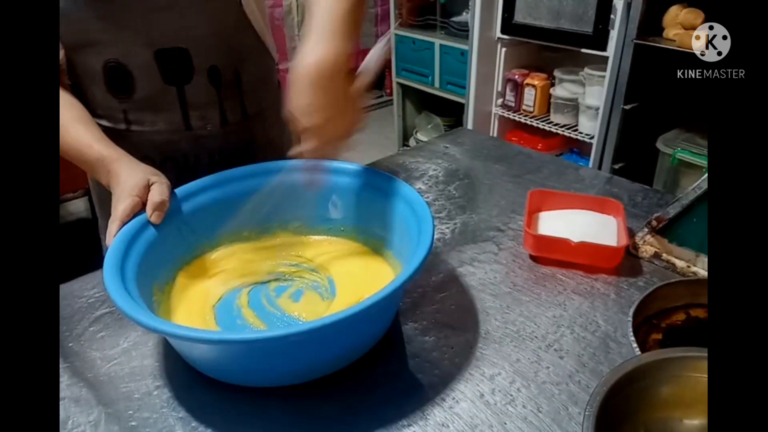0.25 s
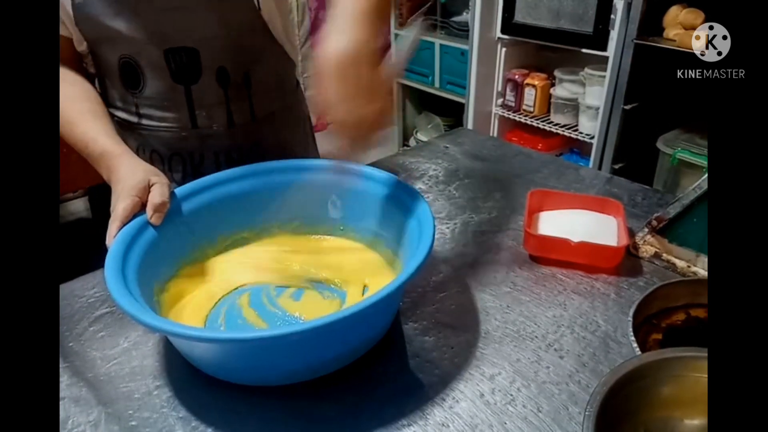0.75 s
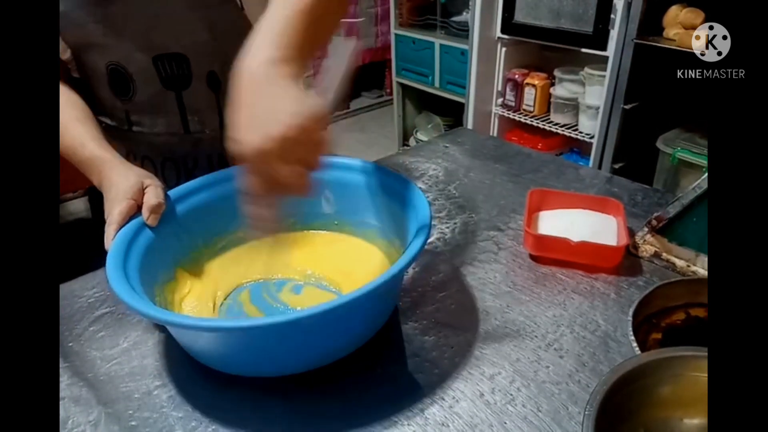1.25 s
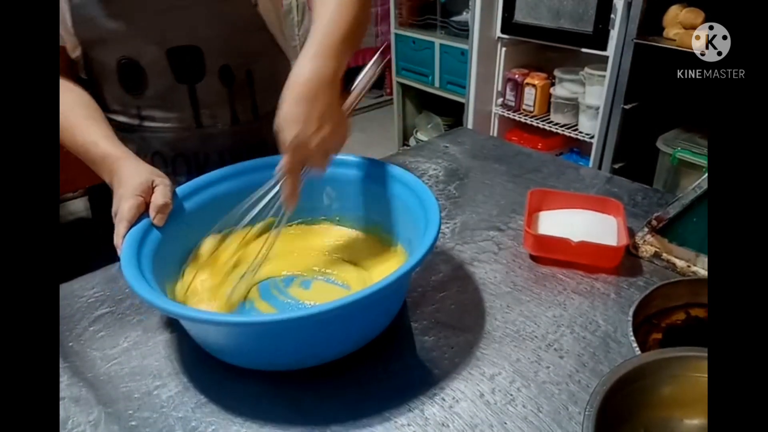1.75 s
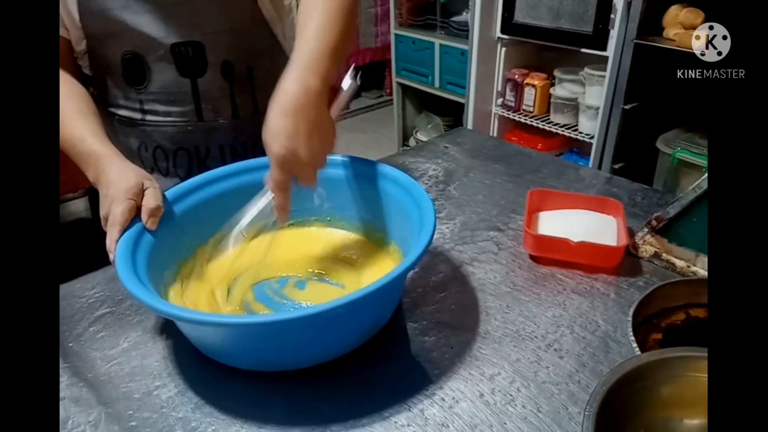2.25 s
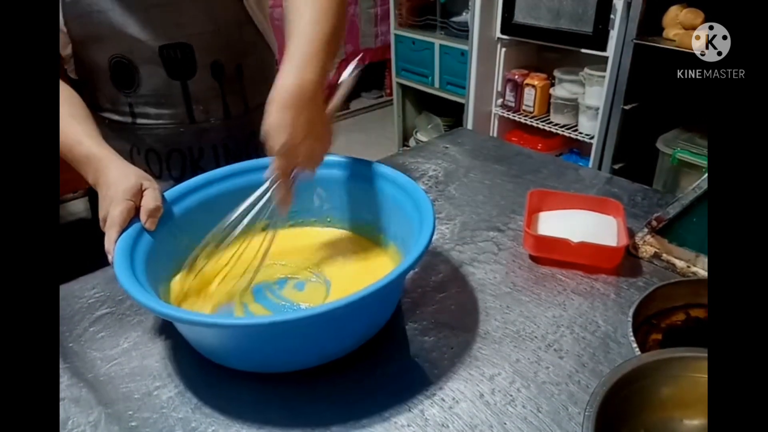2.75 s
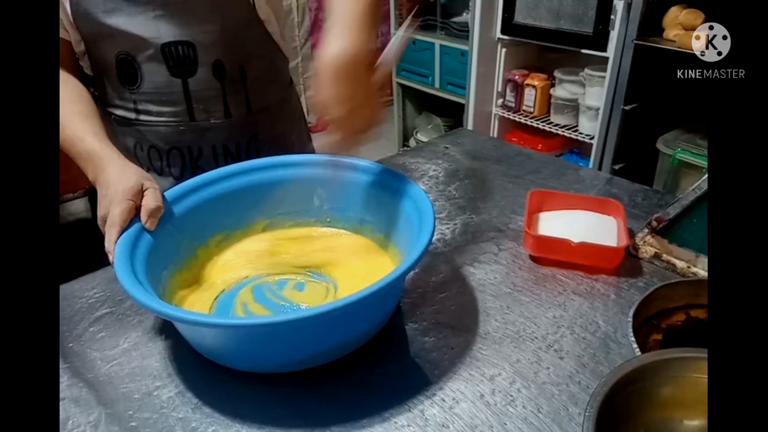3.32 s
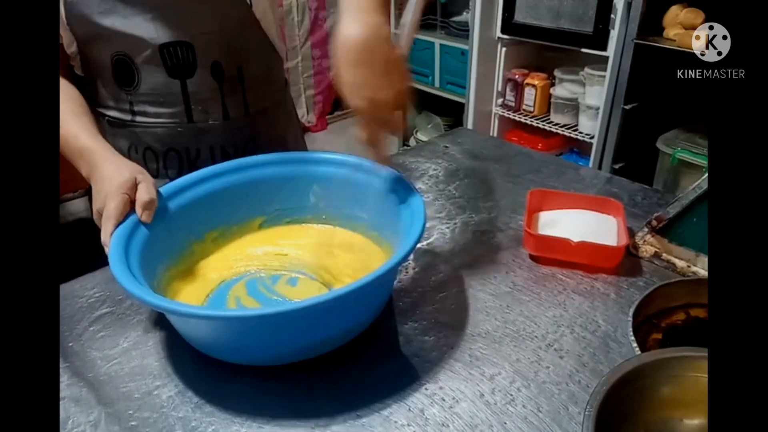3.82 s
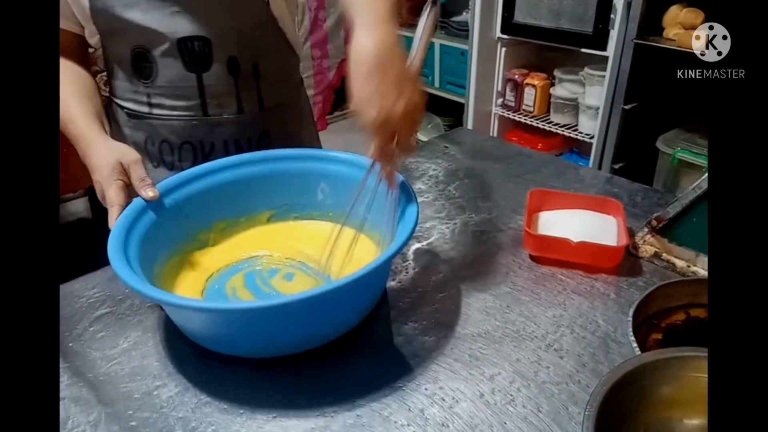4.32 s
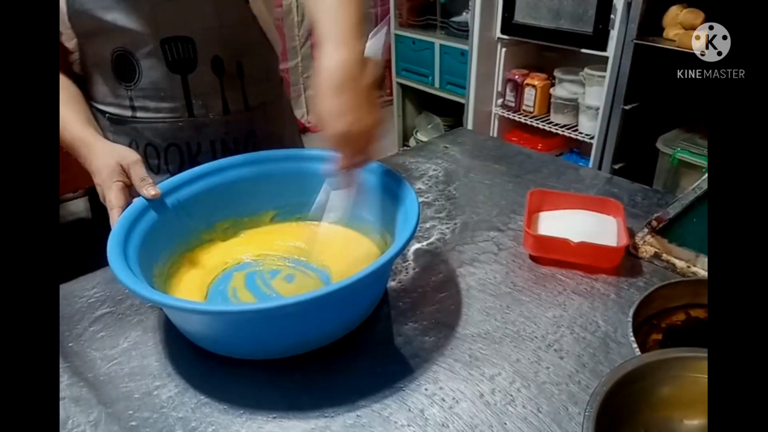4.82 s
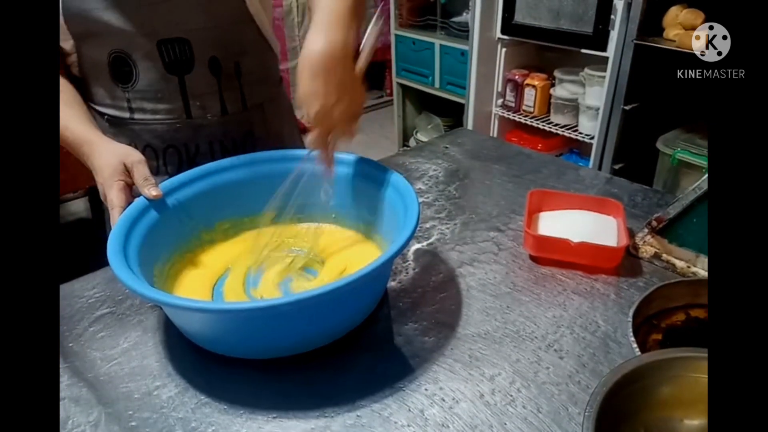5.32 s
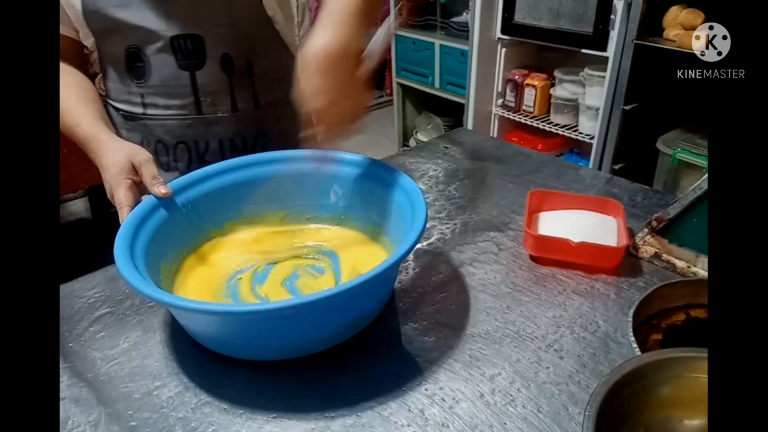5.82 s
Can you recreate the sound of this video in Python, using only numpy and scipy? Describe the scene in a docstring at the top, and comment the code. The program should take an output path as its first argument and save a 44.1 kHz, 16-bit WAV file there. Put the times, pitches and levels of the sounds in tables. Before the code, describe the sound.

Whisking is already under way and continues without stopping: brisk, swishing, raspy wire strokes through wet batter, with tiny gaps between them. Air pockets pop loudly in the first two seconds, then thin out and return later. Plastic knocks and low thuds punctuate the rhythm, with heavy bumps before the middle and near the end, plus a few tiny squeaks. Heard close, in a small, lightly echoing kitchen; it cuts off mid-stroke.

```python
"""On a kitchen table a wire whisk beats thin batter in a plastic bowl; two microphone ports pick it up for six seconds.
It opens within a stroke and keeps on at about two and a half strokes a second, with fine crackle where wires tear the film.
Hollows glug; pockets of air pop, loudest in the first two seconds, few between 2 and 4 s; loops clatter on the plastic.
The bowl drums at its low wall mode and bumps the table, hardest near 1.4 and 5.4 s; wires squeak between 3.4 and 5.4 s.
It ends within a stroke; steady room tone and the short echoes of a small kitchen lie behind it all."""
import sys
import numpy as np
from scipy import signal
from scipy.fft import rfft, irfft
from scipy.io import wavfile
from scipy.ndimage import uniform_filter1d

SR = 44100
rng = np.random.default_rng(int(sys.argv[2]) if len(sys.argv) > 2 else 0)


def transcribe(u):
    """Save the signal u as a 16-bit wav file named by the first command-line argument.

    u: samples, shape (n,) or (channels, n), limited to [-1, 1]; the rate is SR.
    q: integer samples, one column per channel.
    """
    v = np.clip(np.atleast_2d(u).T, -1, 1)
    q = np.round(v * 32767).astype(np.int16)
    wavfile.write(sys.argv[1], SR, q)


N = 267687


def gain_of(db):
    """Decibels to an amplitude factor."""
    return 10 ** (np.asarray(db) / 20)


def evened(x):
    """Scales to rms 1."""
    return x / np.sqrt(np.mean(x ** 2) + 1e-20)


def read(points, hz):
    """Reads a table of (Hz, value) along a log-frequency axis."""
    f, value = np.transpose(points)
    return np.interp(np.log(hz + 1), np.log(f + 1), value)


def add(mix, s, sound):
    """Mixes a sound in at a time in seconds."""
    part = mix[max(0, round(s * SR)):][:len(sound)]
    part += sound[:len(part)]


def colour(x, points, size=4096):
    """Causal (minimum-phase) filter with the given spectrum in dB."""
    log_gain = np.log(gain_of(read(points, abs(np.fft.fftfreq(size, 1 / SR)))))
    taps = np.fft.ifft(np.exp(np.conj(signal.hilbert(log_gain)))).real[:size // 2]
    return signal.oaconvolve(x, taps)[:len(x)]


def resonate(x, hz, width):
    """A resonance of gain 1, fixed or following a curve: shift it to 0 Hz, smooth, shift back."""
    turn = np.exp(2j * np.pi * np.cumsum(hz * np.ones(len(x))) / SR)
    r = np.exp(-np.pi * width / SR)
    return 2 * (turn * signal.lfilter([1 - r], [1, -r], x / turn + 1e-18)).real


def resonate_twice(x, hz, width):
    """Two resonances in a row, the second twice as wide, for steeper skirts."""
    return resonate(resonate(x, hz, width), hz, 2 * width)


def tone(hz):
    """Sine that follows a pitch curve."""
    return np.sin(2 * np.pi * np.cumsum(hz) / SR)


def decay(t, t60):
    """Exponential fade of 60 dB in t60 seconds."""
    return np.exp(-np.log(1000) * t / t60)


def wander(rate_hz):
    """Smooth random curve of rms 1 that moves up to about a rate."""
    hz = np.fft.rfftfreq(N, 1 / SR)
    return evened(irfft(rfft(rng.standard_normal(N)) / (1 + (hz / rate_hz) ** 4), N))


def grains(per_s, spread_db):
    """Random clicks, most small and a few large."""
    size = gain_of(spread_db * np.minimum(rng.exponential(1, N), 4))
    return size * rng.choice([-1, 1], N) * (rng.random(N) < per_s / SR)


def band_noise(low_hz, high_hz, size):
    """Noise of rms 1 between two edges."""
    band = signal.butter(3, [low_hz, high_hz], "bandpass", fs=SR, output="sos")
    return evened(signal.sosfilt(band, rng.standard_normal(size)))


# Spectrum of the empty kitchen. Each row: frequency in Hz, relative density in dB per Hz.
KITCHEN_HUSH = [(20, -29), (75, 6), (130, -14), (300, -0.5), (1000, -15), (3000, -8), (7000, -28),
                (15000, -32)]


def room_tone(floor_db=-56):
    """The quiet background of the kitchen: steady coloured noise, independent at each port."""
    return gain_of(floor_db) * np.array([evened(colour(rng.standard_normal(N), KITCHEN_HUSH)) for _ in range(2)])


# How long the kitchen rings. Each row: frequency in Hz, t60 in s.
KITCHEN_DECAY = [(100, 0.041), (500, 0.29), (2000, 0.3), (5000, 0.25), (12000, 0.22)]


def kitchen(x, early_db=6, early_s=0.0072):
    """Sparse echoes, strongest from the table and near shelves, each band dying at its own speed."""
    t = np.arange(SR) / SR
    taps = rng.choice([-1., 1.], (2, SR)) * (rng.random((2, SR)) < 3000 / SR) * (t > .002)
    taps = taps * (1 + gain_of(early_db) * np.exp(-t / early_s))
    hz, age, z = signal.stft(taps, SR, nperseg=256)
    fade = gain_of(-60 * age / read(KITCHEN_DECAY, hz)[:, None])
    tail = signal.istft(z * fade, SR, nperseg=256)[1]
    tail = tail / np.linalg.norm(tail, axis=1, keepdims=True)
    return signal.fftconvolve(x, tail, axes=1)[:, :N]


# First echoes off the bowl wall and the table; the strongest comes about 30 cm the longer way.
# Each row: delay to the left port in s, delay to the right port in s, level in dB.
FIRST_ECHOES = [(.00095, 0.00079, -10.5), (.0019, 0.0012, -38), (.0034, 0.0028, -31)]


def bounced(x):
    """The nearest surfaces send a sound to each port again, by paths of different length."""
    hz = np.fft.rfftfreq(2 * N, 1 / SR)
    paths = 1 + sum(gain_of(db) * np.exp(-2j * np.pi * np.outer([left, right], hz))
                    for left, right, db in FIRST_ECHOES)
    return irfft(rfft(x, 2 * N) * paths)[:, :N]


# Modes of the hollow of the bowl. Each row: frequency in Hz, width in Hz, relative level in dB.
HOLLOW_MODES = [(227, 7.1, 2), (429, 30, 2), (509.3, 30.3, 7.5), (735, 46, 5), (810.4, 17.5, 1),
                (1330, 70, -12)]


def bowl(x, ring_db=-2, drift=0.015, drift_hz=4):
    """Part of the sound leaves the bowl at once, part rings in its hollow, whose modes drift as the batter swirls."""
    swirl = 1 + drift * wander(drift_hz)
    return x + sum(gain_of(db + ring_db) * resonate(x, hz * swirl, width) for hz, width, db in HOLLOW_MODES)


def drumming(push, wall_hz=105, width_hz=26, rumble_db=-12):
    """The push of the whisk keeps the wall throbbing at its lowest mode, over a broader rumble."""
    sway = evened(resonate_twice(rng.standard_normal(N), wall_hz, width_hz))
    return push * (sway + gain_of(rumble_db) * band_noise(low_hz=65, high_hz=149.0, size=N))


# Higher modes of the bowl that a bump sets off.
# Each row: frequency in Hz, level relative to the bump in dB before its hardness, t60 in s.
THUD_MODES = [(170, -15, 0.095), (230.4, -9.5, 0.072), (334, -5, 0.03), (500, -20, 0.11)]
# The bowl bumping the table. Each row: start in seconds, level in dB, t60 of the ring in s,
# hum of the table top relative to that level in dB, settled pitch of the wall in Hz, hardness of the thud in dB.
TABLE_BUMPS = [(0.403, -24, 0.27, -10, 101.3, 3), (0.554, -41, 0.14, -18, 114, -3),
               (0.715, -19.5, 0.25, -20, 105, -2), (0.872, -17, 0.37, -36, 105.6, -25),
               (0.9263, -20, 0.19, -28, 104, -14), (1.008, -21, 0.15, -16, 108, -17),
               (1.093, -18, 0.11, -8, 108, 2), (1.124, -18, 0.18, -2.5, 102, -3),
               (1.39, -5.5, 0.26, -26, 103, -3), (1.467, -9, 0.086, -20, 104, -14),
               (1.586, -20, 0.19, -11, 99, -8), (1.936, -28.5, 0.4, -18, 106, -2),
               (2.077, -20.5, 0.41, -18, 104.4, 7), (2.241, -19, 0.13, -21, 101, -17),
               (2.3, -23, 0.22, -24, 102, -14), (2.365, -18.5, 0.19, -23, 98, -12),
               (2.82, -20.5, 0.24, -14, 107.5, -2), (3.578, -22, 0.18, -22, 109.6, -10),
               (3.75, -35, 0.17, -16, 103, -14), (4.117, -25, 0.4, -20, 108.4, -10),
               (4.371, -29, .2, -7, 94.5, -5), (4.598, -21, 0.24, -8, 100, -10),
               (4.825, -26.5, 0.16, -2, 102, -6), (5.199, -28, 0.18, -7, 101, -8),
               (5.389, -6.5, 0.16, -17, 99.5, -7), (5.455, -18, 0.25, -2, 99.7, -20),
               (5.551, -25, 0.26, 1, 100, -14), (5.992, -17.5, 0.18, -8, 98.4, 2.5)]


def bumps(rise_s=0.016, stiffen=0.21, relax_s=0.003, thud_rise_s=0.0042, table_hz=68):
    """The base lands with a thud; the wall rings on, a little sharp while it is bent, and the table top hums."""
    t, out = np.arange(SR // 2) / SR, np.zeros(N)
    for s, db, t60, table_db, hz, hard_db in TABLE_BUMPS:
        wall = tone(hz * (1 + stiffen * np.exp(-t / relax_s)))
        top = gain_of(table_db) * np.sin(2 * np.pi * table_hz * t)
        ring = (wall + top) * decay(t, t60) * (1 - np.exp(-t / rise_s))
        thud = np.zeros(len(t))
        for mode_hz, mode_db, mode_t60 in THUD_MODES:
            mode = np.sin(2 * np.pi * (mode_hz * t + rng.random())) * decay(t, mode_t60)
            thud += gain_of(mode_db + hard_db) * mode
        add(out, s, gain_of(db) * (ring + thud * (1 - np.exp(-t / thud_rise_s))))
    return out


# What the plastic wall rings with when struck. Each row: frequency in Hz, width in Hz, relative level in dB.
PLASTIC_MODES = [(418, 40, -4), (506, 23, 8.5), (728, 32, 0), (816, 20, 3.5), (1168, 36, -8),
                 (1215, 30, -0.5), (2040, 70, -5), (2324, 60, -5), (2740, 90, -6), (3094, 71, -1)]


def wall_ring(x, spot_hz, spot_db=6.5):
    """The plastic wall answers a blow, most at the modes that the struck spot favours."""
    # a mode loses spot_db at one octave from the favoured pitch, and four times that at two
    return sum(gain_of(db - spot_db * np.log2(hz / spot_hz) ** 2) * evened(resonate(x, hz, width))
               for hz, width, db in PLASTIC_MODES)


# A wire on bare plastic. Each row: start in seconds, length in s, level in dB before the trim, pitch in Hz.
WIRE_SQUEAKS = [(3.389, 0.012, -28, 4120), (3.573, .06, -30, 2475), (3.592, 0.012, -34, 2970),
                (5.338, 0.01, -18.5, 2134)]


def squeaks(trim_db=-3, jitter=0.018, jitter_hz=420, chatter_db=4):
    """Stick and slip gives a brief, unsteady, chattering tone."""
    out = np.zeros(N)
    unsteady = 1 + jitter * wander(jitter_hz)
    grip = gain_of(chatter_db * wander(jitter_hz))
    for s, length, db, hz in WIRE_SQUEAKS:
        span = slice(round(s * SR), round((s + length) * SR))
        pitch = hz * unsteady[span]
        squeak = tone(pitch) * grip[span] * signal.windows.tukey(len(pitch), .7)
        add(out, s, gain_of(db + trim_db) * evened(squeak))
    return out


# The loops of the whisk clattering hard on the bowl.
# Each row: start in seconds, level in dB, fade in s, pitch that the struck spot favours in Hz.
LOOP_KNOCKS = [(.394, -18, 0.0087, 800), (.86, -18.5, 0.024, 920), (1.097, -13, 0.012, 594),
               (2.078, -32, 0.049, 1000), (2.246, -27.5, 0.016, 900), (4.34, -23, 0.011, 800),
               (5.324, -23.5, 0.009, 750), (5.348, -12, 0.0061, 480), (5.444, -25, 0.0089, 950),
               (5.505, -21.5, 0.011, 480)]


def knocks(wire_gap_s=.0035, rise_s=0.0021, cushion_hz=2600):
    """The wire loops land one after another, cushioned by batter, and set the wall ringing."""
    t, out = np.arange(SR // 4) / SR, np.zeros(N)
    for s, db, fade_s, spot_hz in LOOP_KNOCKS:
        fade = np.exp(-t / fade_s) * (1 - np.exp(-t / rise_s))
        landed = np.cumsum(rng.uniform(.5, 1.5, size=24)) * wire_gap_s
        # one click of random sign at each landing
        rattle = np.diff(np.searchsorted(landed, t), prepend=0) * rng.choice([-1, 1], len(t)) * fade
        ring = signal.lfilter(*signal.butter(2, cushion_hz, fs=SR), wall_ring(rattle, spot_hz))
        add(out, s, gain_of(db) * ring * np.linalg.norm(fade) / np.linalg.norm(ring))
    return out


# The harder slaps of wires on the wall. Each row: start in seconds, level in dB before the trim.
WIRE_SLAPS = [(0.2356, -16.5), (0.3762, -15.5), (0.3916, -25), (.398, -10.5), (0.4857, -16), (0.5503, -14),
              (0.724, -18), (0.8557, -9), (0.863, -14), (1.09, -15), (1.1975, -37), (1.237, -23),
              (1.3432, -14), (1.4204, -18), (1.4638, -13), (1.533, -13), (1.603, -13), (1.6569, -11),
              (2.064, -24), (2.0759, -14), (2.245, -12.5), (2.389, -21), (2.462, -20), (2.9966, -13.5),
              (3.031, -14.5), (3.1172, -17), (3.3722, -20), (3.44, -33), (3.4862, -23), (3.5798, -18),
              (3.7815, -26.5), (3.959, -19.5), (4.0983, -27), (4.1608, -17), (4.2667, -21), (4.3376, -13),
              (4.4393, -13.5), (4.447, -16), (4.7785, -16), (4.792, -18), (4.8713, -22), (4.8998, -30),
              (4.9422, -13), (5.1346, -18), (5.1968, -14.5), (5.2435, -16.5), (5.3252, -17), (5.34, -13),
              (5.3443, -6.5), (5.442, -12.5), (5.5025, -11.5), (5.5508, -19), (5.6653, -17), (5.7854, -17),
              (5.948, -26.5), (5.966, -16.5)]
# centre pitch of the struck plastic, and its spread from spot to spot (natural log)
TICK_HZ, TICK_SCATTER = 2400, 0.25


def slaps(trim_db=-4.5, fade_s=0.0026, width_hz=700, tick_db=6, dull_hz=5600, ring_db=-5, ring_octaves=.6):
    """Wires hit the wet plastic in a burst of noise; the spot ticks at its own pitch and the wall rings briefly."""
    t, out = np.arange(SR // 8) / SR, np.zeros(N)
    fade = np.exp(-t / fade_s)
    for s, db in WIRE_SLAPS:
        hz = TICK_HZ * np.exp(TICK_SCATTER * rng.standard_normal())
        burst = colour(rng.laplace(size=len(t)) * fade, SCRAPE_SPECTRUM)
        ring = wall_ring(burst, hz * 2 ** (ring_octaves * rng.uniform(-1.2, 0)))
        tick = gain_of(tick_db) * resonate(burst, hz, width_hz)
        hit = evened(burst + tick) + gain_of(ring_db) * evened(ring)
        hit = signal.lfilter(*signal.butter(1, dull_hz, fs=SR), hit)  # batter cushions the blow
        add(out, s, gain_of(db + trim_db) * hit * np.linalg.norm(fade) / np.linalg.norm(hit))
    return out


# Hollows opening behind the whisk.
# Each row: start in seconds, length in s, level in dB before the trim, first pitch in Hz.
HOLLOW_GLUGS = [(0, 0.026, -28, 583), (0.388, 0.025, -38, 760), (0.425, 0.034, -26.5, 553),
                (0.838, 0.058, -28, 956), (2.385, 0.033, -32.5, 592), (2.468, 0.027, -33.5, 880),
                (2.512, 0.037, -27, 573), (2.945, 0.029, -38, 750), (2.968, 0.019, -33.5, 503),
                (3.39, 0.023, -30.5, 770), (4.27, 0.035, -31, 828), (4.726, 0.04, -30, 525),
                (4.912, 0.029, -29, 596), (4.941, 0.022, -29, 652), (5.085, 0.022, -31, 1000),
                (5.091, 0.023, -28, 815), (5.321, 0.018, -21.5, 910), (5.786, 0.023, -30.5, 652),
                (5.912, 0.025, -34, 844), (5.951, 0.013, -24, 530)]
GLUG_FALL = 0.59  # last pitch over first pitch


def glugs(trim_db=-5, width_hz=120, wire_gap_s=.009, spatter=0.055, rough_db=-6, peak_early=.6):
    """The hollow behind the whisk rings with a pitch that falls as it opens; passing wires pluck and roughen it."""
    out = np.zeros(N)
    for s, length, db, first in HOLLOW_GLUGS:
        hz = np.geomspace(first, first * GLUG_FALL, int(length * SR))
        plucks = spatter * rng.standard_normal(SR)
        plucks[(np.cumsum(rng.uniform(.5, 1.5, size=16)) * wire_gap_s * SR).astype(int)] += 1
        plucks[0] += 1
        plucked = resonate_twice(plucks[:len(hz)], hz, width_hz)
        hollow = evened(tone(hz)) + gain_of(rough_db) * evened(plucked)
        swell = np.sin(np.pi * np.linspace(0, 1, len(hz)) ** peak_early)
        add(out, s, gain_of(db + trim_db) * evened(hollow * swell))
    return out


# Air pockets snapping open. Each row: start in seconds, level in dB, pitch midway through its sag in Hz.
AIR_POPS = [(0.39, -11, 1254), (0.3976, -12, 1290), (.724, -23, 1060), (.857, -5.5, 1257), (.864, -7, 1245),
            (1.0913, -13.5, 1250), (1.473, -16, 1340), (1.5237, -6.5, 1500), (1.538, -9, 2630),
            (1.627, -15.5, 1410), (1.655, -9.5, 1520), (2.077, -15, 1630), (3.523, -23.5, 1310),
            (3.667, -26, 1190), (4.1, -18.5, 1070), (4.111, -22, 1100), (4.145, -23, 1480),
            (4.163, -18, 1440), (4.339, -12.5, 1130), (4.345, -15.5, 1320), (4.5603, -22, 1060),
            (4.792, -16.5, 1330), (5.087, -16, 980), (5.12, -19, 1430), (5.443, -9.5, 936),
            (5.449, -12, 1290), (5.964, -14, 1260)]
POP_T60_S = 0.022


def pops(rise_s=0.00047, sag=0.11, sag_s=0.0045, puff_db=-9, puff_s=0.0027, puff_ratio=0.84, width_hz=450):
    """A pocket snaps open: a damped tone sags as the hole widens, with a lower puff as the batter falls back."""
    t, out = np.arange(SR // 10) / SR, np.zeros(N)
    fade = np.exp(-t / puff_s)
    for s, db, hz in AIR_POPS:
        ring = tone(hz * (1 + sag * (np.exp(-t / sag_s) - .5))) * decay(t, POP_T60_S)
        puff = resonate_twice(rng.standard_normal(len(t)), puff_ratio * hz, width_hz) * fade
        puff *= gain_of(puff_db) * np.linalg.norm(fade) / np.linalg.norm(puff)
        add(out, s, gain_of(db) * (ring + puff) * (1 - np.exp(-t / rise_s)))
    return out


SPLASH_DB, SPLASH_S = -17.5, 0.0058  # slosh gain relative to the pop, and its fade


def splashes():
    """Slosh gain: every pop throws up batter that falls back as a brief burst of slosh."""
    gain, fade = np.zeros(N), np.exp(-np.arange(SR // 4) / SR / SPLASH_S)
    for s, db, _ in AIR_POPS:
        add(gain, s, gain_of(db + SPLASH_DB) * fade)
    return gain


# Spectrum of the sloshing batter. Each row: frequency in Hz, relative density in dB per Hz.
SLOSH_SPECTRUM = [(100, -14.5), (190, -2.5), (250, -2), (320, 0.5), (450, 2), (520, 1.5), (620, 2.5),
                  (780, 1.5), (950, -2), (1400, -4), (1800, -4), (3000, -9)]


def slosh(gain, trim_db=-5.0, cycles=4, glide=0.07, count=28):
    """Small pockets of air in the batter, each ringing for a few cycles with a bending pitch."""
    t, out = np.arange(SR // 20) / SR, np.zeros(N)
    for hz in np.geomspace(200, 2200, count):
        age = t * hz / cycles
        bend = 1 + glide * rng.standard_normal() * np.tanh(age)
        pocket = tone(hz * bend) * np.exp(-age) * hz
        out += signal.oaconvolve(grains(per_s=50, spread_db=3.0), pocket)[:N]
    return evened(colour(out, SLOSH_SPECTRUM)) * gain * gain_of(trim_db)


def wire_ticks(fizz, trim_db=-6, low_hz=1200, high_hz=6200, ring_s=0.0017, rasp_s=.003, slips_per_s=650, count=26):
    """Single wires skip over the plastic: each tick is a few quick slips, ringing at the pitch of its own spot."""
    t, out = np.arange(SR // 30) / SR, np.zeros(N)
    for hz in np.geomspace(low_hz, high_hz, count):
        slips = (rng.random(len(t)) < slips_per_s / SR) * np.exp(-t / rasp_s)
        slips[0] = 1
        rasp = signal.fftconvolve(slips, np.sin(2 * np.pi * hz * t) * np.exp(-t / ring_s))
        out += signal.oaconvolve(grains(per_s=14, spread_db=2.2), evened(rasp) * np.sqrt(hz))[:N]
    return bounced(evened(colour(out, SCRAPE_SPECTRUM)) * fizz * gain_of(trim_db))


def shifting(x, depth_db):
    """The film thins and thickens under the wires, so the colour drifts in patches of some 500 Hz by 30 ms."""
    z = signal.stft(x, nperseg=256, noverlap=192)[2]
    patches = rng.standard_normal(z.shape[1:])  # the same at both ports
    patches = evened(uniform_filter1d(uniform_filter1d(patches, size=3, axis=0), size=20, axis=1))
    return evened(signal.istft(z * gain_of(depth_db * patches), nperseg=256, noverlap=192)[1][:, :N])


def touches(per_s, fade_s, depth):
    """One wire loop after another catches the wall: each touch lifts the scrape in about a millisecond and fades."""
    loops = np.diff(np.floor(np.cumsum(per_s * np.exp(.5 * wander(rate_hz=40))) / SR), prepend=0)
    lift = signal.lfilter([1], [1, -np.exp(-1 / (fade_s * SR))], loops * rng.uniform(0.64, 0.67, N))
    return evened(1 + depth * uniform_filter1d(lift, size=48))


# Spectrum of wires on the wet wall, also for slaps and ticks.
# Each row: frequency in Hz, relative density in dB per Hz.
SCRAPE_SPECTRUM = [(250, -20), (800, -8), (1300, -4.5), (1700, -8), (2300, 0), (3100, -2.5), (4400, -6),
                   (5600, -12), (7000, -18), (7700, -18), (9000, -26), (11500, -33.5), (15000, -33)]


def scrape(gain, fizz, trim_db=0.35, apart=0.96, split_hz=3900):
    """Wires tear the film of batter: clumped crackle from all round the wall, partly different at each port."""
    shared, left, right = (evened(colour(grains(per_s=2800, spread_db=0.5), SCRAPE_SPECTRUM)) for _ in range(3))
    ports = np.sqrt(1 - apart) * shared + np.sqrt(apart) * np.array([left, right])
    crackle = shifting(ports, depth_db=2.0)
    body = signal.sosfiltfilt(signal.butter(2, split_hz, fs=SR, output="sos"), crackle)
    # fast wires in a thin film add fizz on top of the body of the scrape
    crackle = body * gain + (crackle - body) * fizz
    return crackle * gain_of(trim_db) * touches(per_s=75, fade_s=0.005, depth=0.7)


def stroke(start, end, bite_s, first_db, last_db, fall_db_per_s, sweep_db):
    """Gain of one stroke: it bites, runs from its first to its last level along the sweep, and dies away."""
    t = np.arange(N) / SR
    share = np.clip((t - start) / (end - start), 0, 1)
    sweep = np.interp(share, np.linspace(0, 1, len(sweep_db)), sweep_db)
    held = first_db + (last_db - first_db) * share + sweep
    return np.clip((t - start) / bite_s, 0, 1) * gain_of(held - fall_db_per_s * np.maximum(t - end, 0))


# Shared by all strokes: batter is swept up early, and the wires are fastest in the thin film on the way back.
# Each row, at even steps through a stroke: scrape in dB, slosh in dB, fizz relative to the scrape in dB.
STROKE_SWEEP = [(1, 3, -4.5), (0.5, 0, -7.5), (2.5, 1.5, -9.5), (-1, -1.5, -2), (-3, -2.3, -4.5)]
# Strokes round the bowl, digging in or easing off, with a change of level where the hand changes direction.
# Each row: start in seconds, end in s, time to bite in s, scrape at the start in dB, scrape at the end in dB,
# time of the lull in s, its gain in dB, further fizz relative to the scrape in dB,
# slosh relative to the scrape in dB, push on the wall in dB. The sweep, swerves and trims add to these levels.
WHISK_STROKES = [(-.078, 0.231, .04, -26.5, -33, .075, -7.5, 3, -1, -42.5),
                 (0.3, 0.709, 0.1, -29, -32, .45, -0.5, 2.5, 0, -40.5),
                 (0.786, 1.107, 0.042, -36, -34, 1.005, -3, 2.5, -1, -40.5),
                 (1.188, 1.556, 0.016, -33.5, -27, 1.26, -1, -0.5, -2.5, -45),
                 (1.58, 1.828, 0.08, -22, -31.5, 1.75, -5, -0.5, 0.5, -46.5),
                 (2.0635, 2.374, 0.0022, -36, -31, 2.17, 0.5, 1.5, 0.5, -42),
                 (2.451, 2.827, 0.016, -31.5, -29, 2.69, -2.5, -0.5, -4, -41),
                 (2.882, 3.269, 0.1, -31, -29.5, 3.09, -4, 3.5, -1, -42.5),
                 (3.353, 3.688, 0.027, -30.5, -29, 3.465, -2.5, 1.5, -5, -43.5),
                 (3.797, 4.146, 0.039, -33, -26.5, 3.98, -7.5, 1.5, -4, -47),
                 (4.227, 4.586, 0.065, -34, -32.5, 4.53, -2.5, 5, -0.5, -40.5),
                 (4.651, 4.985, 0.074, -33, -24.5, 4.85, -2.5, 2, -3, -42),
                 (5.051, 5.355, 0.021, -31, -27, 5.225, -8, 2, -0.5, -42.5),
                 (5.417, 5.823, 0.018, -31.5, -34, 5.625, -4.5, 0.5, -2.5, -48.5),
                 (5.868, 6.22, 0.1, -30, -32.5, 6.12, -7, 3.5, -1, -50)]
# Brief rises and dips in level of the scrape, fizz and slosh.
# Each row: centre in seconds, gain in scrape in dB, gain in fizz in dB, gain in slosh in dB.
LEVEL_SWERVES = [(.41, 2, -0.5, 7), (.61, 0, -0.5, 7.5), (.875, 11.5, -4, 8), (.97, -1.5, -5, 6.5),
                 (1.045, 7.5, 4.5, 2), (1.112, -6, 4.5, 7.5), (1.318, -3, 10.5, 8), (1.67, 1.5, 1.5, 0),
                 (2.11, 0.5, -1, 8), (2.26, -2, 3, 2.5), (2.755, 5, 4.5, 3.5), (3.6, 6.5, 0.5, 5),
                 (3.65, -0.5, 6, 4), (4.035, -1.5, -2, 0), (4.085, -6, 4, -5), (4.91, 2, 0.5, -4.5),
                 (5.347, 8, 6.5, 12)]
# once the wires leave the wall, each layer dies at its own speed
SCRAPE_FALL_DB_PER_S, SLOSH_FALL_DB_PER_S, WALL_FALL_DB_PER_S = 243, 136, 78
WALL_LEAN_DB = 2  # the push on the wall grows by this much through a stroke
LULL_S, SWERVE_S = 0.022, 0.021  # time from the centre to 1/e of the dB change


def whisk():
    """The strokes drive four gains: scrape, fizz, slosh and the push on the wall."""
    scrape_db, slosh_db, fizz_db = np.transpose(STROKE_SWEEP)
    t, power = np.arange(N) / SR, np.zeros((4, N))
    for start, end, bite_s, first, last, lull_at, lull_db, bright, wet, push in WHISK_STROKES:
        lull = gain_of(lull_db * np.exp(-((t - lull_at) / LULL_S) ** 2))
        span, run = (start, end, bite_s), (start, end, bite_s, first, last)
        power += np.square([
            lull * stroke(*run, SCRAPE_FALL_DB_PER_S, scrape_db),
            lull * stroke(*run, SCRAPE_FALL_DB_PER_S, scrape_db + fizz_db + bright),
            lull * stroke(*run, SLOSH_FALL_DB_PER_S, slosh_db + wet),
            stroke(*span, push, push + WALL_LEAN_DB, WALL_FALL_DB_PER_S, [0])])
    swerves_db = sum(np.outer([body, bright, wet, 0], np.exp(-((t - s) / SWERVE_S) ** 2))
                     for s, body, bright, wet in LEVEL_SWERVES)
    return np.sqrt(power) * gain_of(swerves_db)


# the batter lies unevenly in the way of the wires
SCRAPE_LUMPS_DB, SLOSH_LUMPS_DB, LUMPS_HZ = 1.0, 2.5, 10.2
FIZZ_FLUTTER_DB, FIZZ_FLUTTER_HZ = 1.6, 27.5  # random flutter in the level of the fizz


def scene(room_db=-5, pocket_room_db=-8):
    """Batter and wires sound from the bowl into the room; the low wall mode reaches both ports alike."""
    scraping, fizzing, sloshing, push = whisk()
    fizzing = fizzing * gain_of(FIZZ_FLUTTER_DB * wander(FIZZ_FLUTTER_HZ))
    sloshing = sloshing * gain_of(SLOSH_LUMPS_DB * wander(LUMPS_HZ))
    wires = scrape(scraping, fizzing) + wire_ticks(fizzing)
    wires = wires * gain_of(SCRAPE_LUMPS_DB * wander(LUMPS_HZ))
    batter = slosh(np.hypot(sloshing, splashes()))
    whisking = wires + bounced(bowl(batter) + knocks() + squeaks()) + slaps()
    pockets = bounced(bowl(pops() + glugs()))
    echoes = kitchen(gain_of(room_db) * whisking + gain_of(pocket_room_db) * pockets)
    return whisking + pockets + echoes + drumming(push) + bumps() + room_tone()


# Colour between the two microphone ports. Each row: frequency in Hz, left minus right in dB.
PORT_BALANCE = [(120, 1), (250, 0.5), (420, 5.5), (520, -1), (650, -10), (830, -1), (1250, 3.5), (1600, -3),
                (2500, -0.5), (4300, -2), (6100, -3.5), (7500, 4), (9500, 0.5), (14000, -3)]
EDGE_HZ = 15550  # upper band limit


def record(dry, lead_s=.00003):
    """Two microphone ports with their own colour, the left about 1 cm nearer; then the band limit."""
    hz = np.fft.rfftfreq(2 * N, 1 / SR)
    # half the difference in level and time goes to each port
    port = gain_of(read(PORT_BALANCE, hz) / 2) * np.exp(1j * np.pi * hz * lead_s)
    heard = irfft(rfft(dry, 2 * N) * np.array([port, 1 / port]))[:, :N]
    low_pass = signal.firwin(511, EDGE_HZ, window=("kaiser", 9), fs=SR)
    return signal.oaconvolve(heard, low_pass[None], "same")


dry = scene()
out = record(dry)
transcribe(out)
```